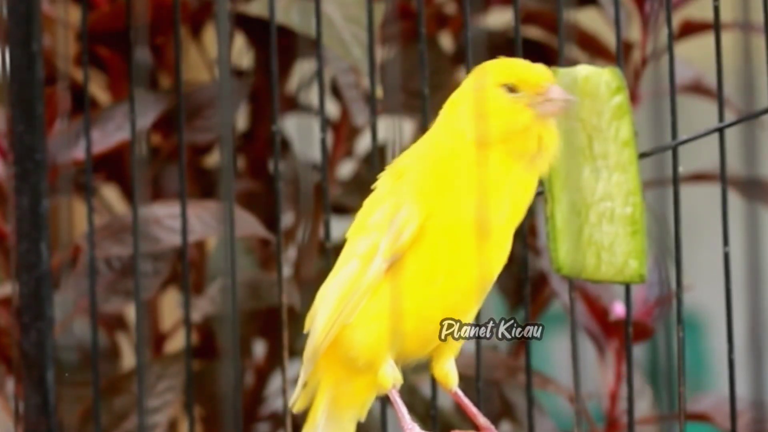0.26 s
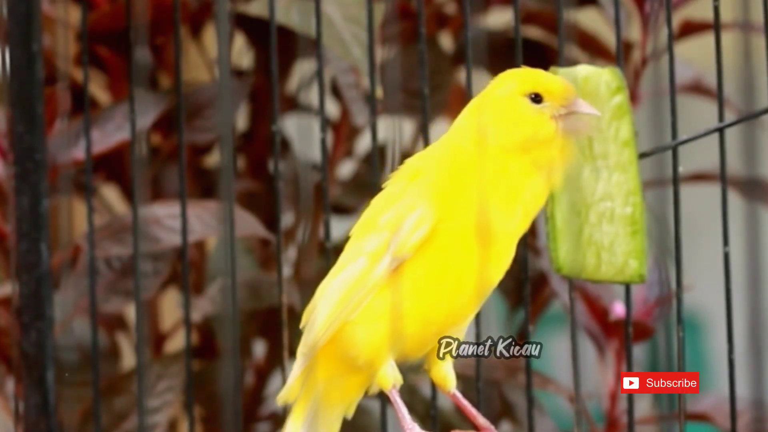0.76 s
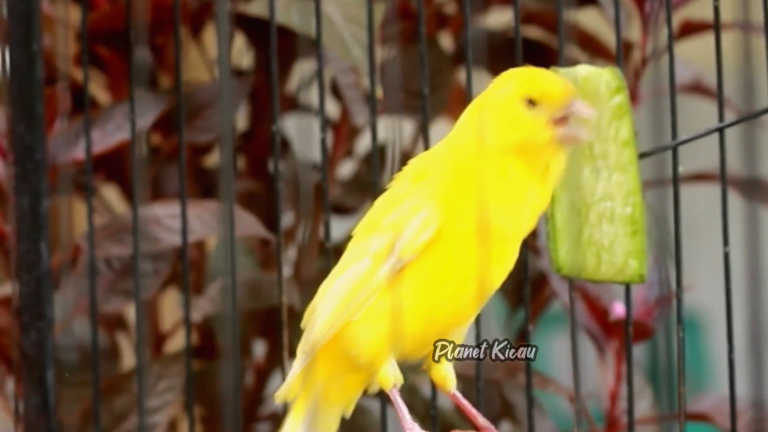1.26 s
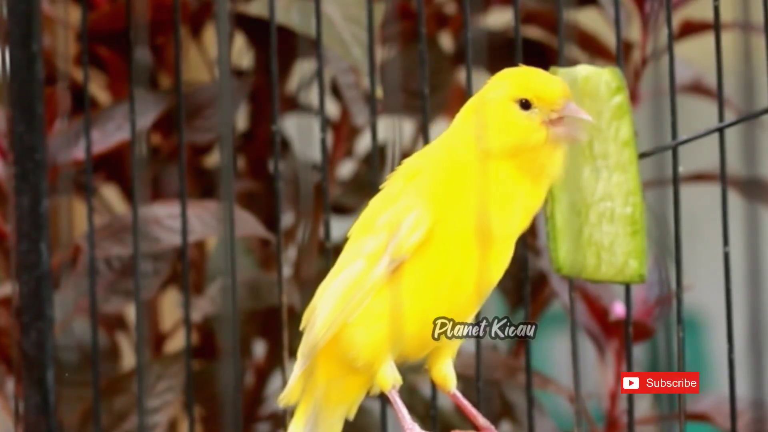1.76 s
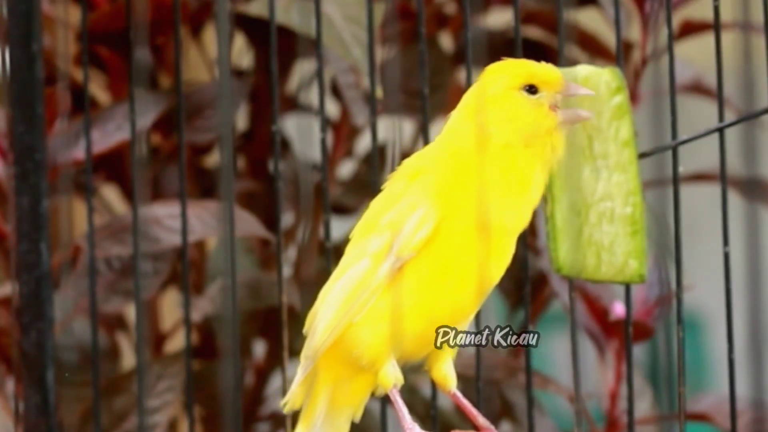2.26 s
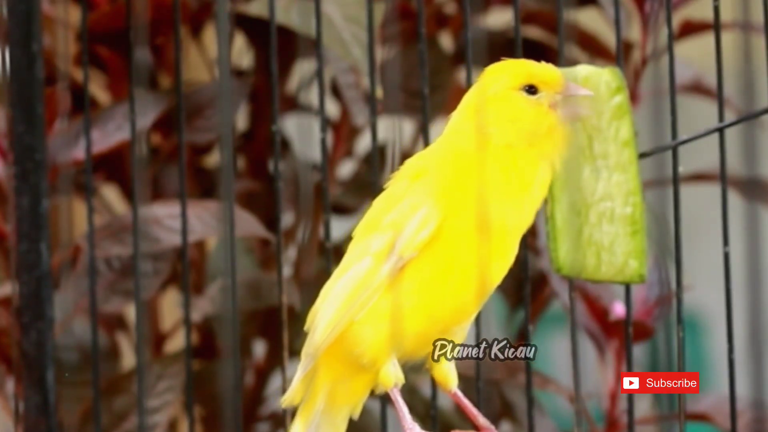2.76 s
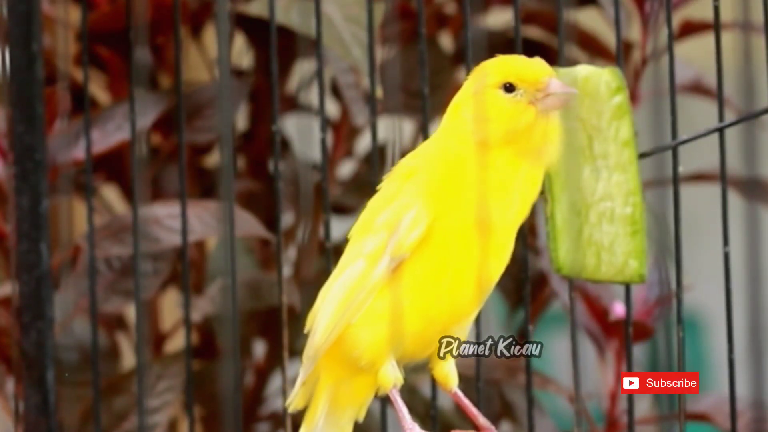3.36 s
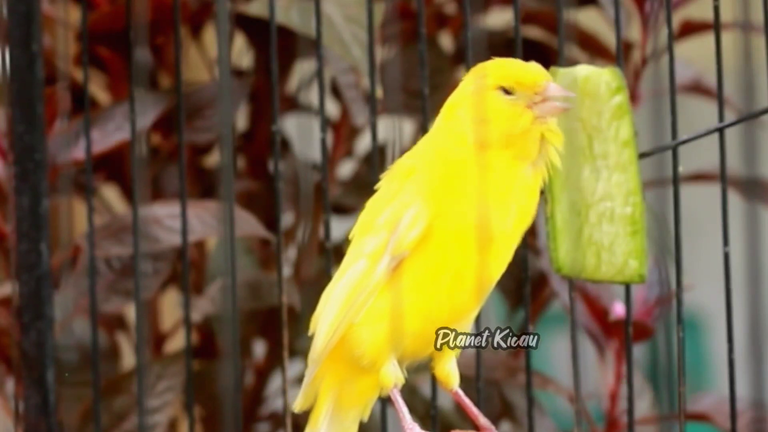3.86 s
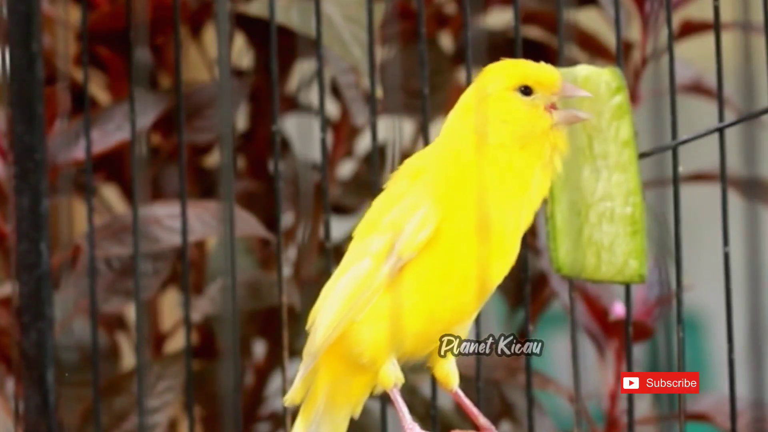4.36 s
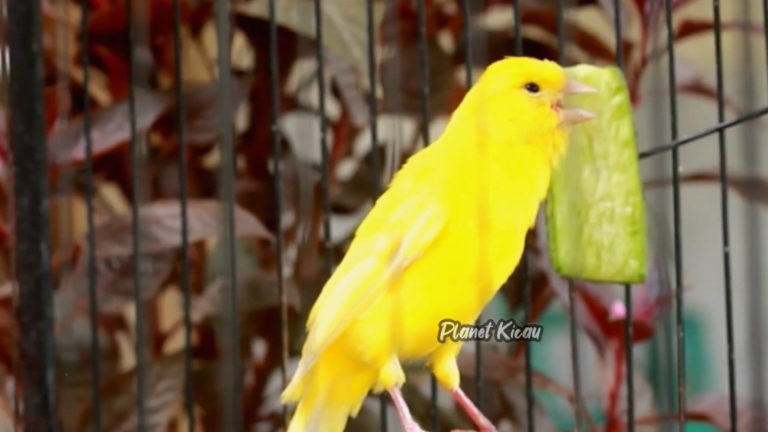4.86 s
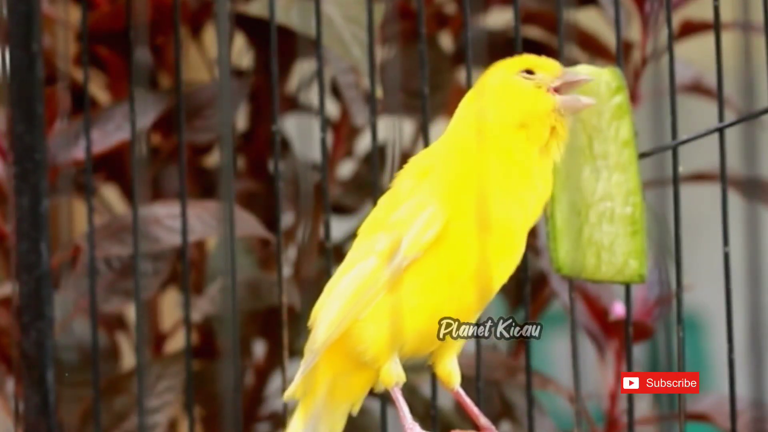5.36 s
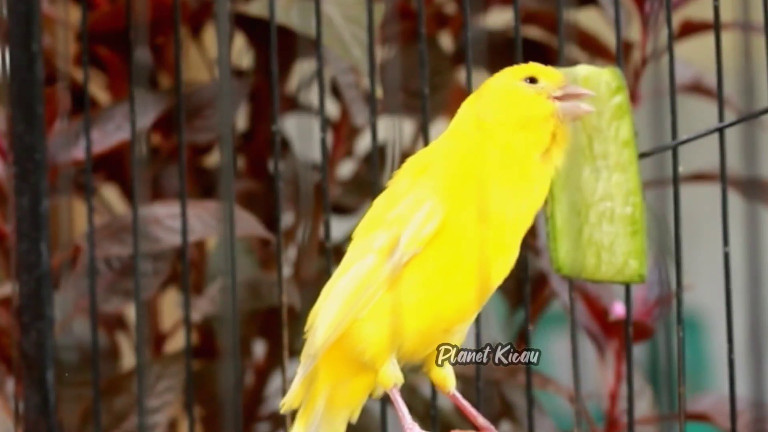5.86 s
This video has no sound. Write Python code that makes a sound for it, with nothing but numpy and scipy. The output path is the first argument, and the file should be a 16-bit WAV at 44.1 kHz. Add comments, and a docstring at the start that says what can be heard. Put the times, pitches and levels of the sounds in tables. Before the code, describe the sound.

A single small songbird, heard close up indoors. It is already trilling at the start: even, very short down-sweeps, crisp and chattering, for almost four seconds. Then the song switches to long, loud, sliding whistles, roughly three or four a second, each dropping from a thin high onset into a strong, clear lower tone, still going at the end. Light room tail; barely audible low rumble and thin hiss beneath.

```python
"""A caged canary sings close to the microphone in a small, quiet room.
First comes a fast trill in three phrases: about ten steep down-sweeps a second, one gliding tone each.
Then come nine long, loud whistles that fall more and more slowly. Every syllable passes from the high
to the low side of the syrinx on its way down, with overtones and a rasp of filtered noise around it.
Early reflections and a decaying tail follow the song; a rumble and a thin hiss lie beneath throughout."""
import sys
import numpy as np
from scipy import signal
from scipy.fft import rfft, irfft, next_fast_len
from scipy.io import wavfile
from scipy.ndimage import uniform_filter1d, map_coordinates

SR = 44100
rng = np.random.default_rng(int(sys.argv[2]) if len(sys.argv) > 2 else 0)


def put_to_file(sound):
    """Save the sound as 16-bit audio at rate SR, in the file named by the first command-line argument."""
    columns = np.atleast_2d(sound).T  # one column per channel
    safe = np.clip(columns, -1, 1)
    whole_steps = np.round(safe * 32767)
    wavfile.write(sys.argv[1], SR, whole_steps.astype(np.int16))


N = 269010  # length of the scene [samples]

# trill syllables: start t/s, length before repeats t/ms, first short repeat after t/ms,
# length of that repeat t/ms, base level/dB
TRILL = [(-0.017, 47.7, 10.5, 2.2, -29), (0.072, 61, 72, 9.2, -26), (0.1679, 49.5, 9, 10, -25.5),
         (0.267, 56.8, 5.5, 8.3, -27), (0.3735, 52.4, 18.5, 12.4, -26.5), (0.4797, 59.7, 58.5, 11.4, -26),
         (0.5792, 56.6, 16.5, 10.4, -27), (0.688, 51.5, 33, 10.7, -27.2), (0.7948, 53.8, 54.5, 12.7, -27),
         (0.8885, 52.5, 1, 11.3, -24), (1.004, 56.9, 20.5, 10.3, -24.5), (1.1135, 68.4, 76, 8.2, -23),
         (1.217, 58.5, 21.5, 11.5, -23.5), (1.3284, 66.3, 26.5, 4.1, -22), (1.4362, 53, 9.5, 13.1, -23.5),
         (1.5466, 66.4, 28, 6.5, -24.5), (1.6668, 50.6, 16, 6, -20.5), (1.7702, 54.3, 19, 8, -27),
         (1.8726, 53.7, 47, 11.2, -26.5), (1.9642, 49, 12.5, 11.2, -27), (2.0656, 53.8, 50, 12.7, -26),
         (2.1597, 48.2, 12.5, 10.6, -28), (2.2548, 50, 23.5, 11.8, -28.5), (2.3548, 44.7, 20, 13.4, -29),
         (2.449, 54.0, 30.5, 12, -26.5), (2.5441, 55.4, 30, 10.2, -27), (2.6422, 58.6, 53.5, 10.6, -29.5),
         (2.7359, 49.7, 12.5, 11.1, -30), (2.8341, 44.3, 26.5, 9.1, -29.3),
         (2.9325, 52.4, 51.0, 12.4, -27.5), (3.0254, 50.4, 19.5, 8.9, -28), (3.115, 51.4, 8, 12.4, -29.0),
         (3.2229, 55.7, 64, 9.9, -27.5), (3.3164, 48, 11.0, 9.2, -28), (3.4134, 52, 20, 12.3, -29),
         (3.5135, 58, 72.0, 11.2, -26.5), (3.6058, 48.4, 4.5, 10.3, -28), (3.7093, 52.2, 18.5, 9.5, -26.5)]
# corner pitches of every trill sweep, from top to bottom, before rounding: f/Hz
TRILL_CORNERS = [7300, 5700, 4100, 3400, 2700, 1470]
# start of each trill phrase: t/s
PHRASE_STARTS = [-0.1, 0.98, 1.74]
# relative time on each leg between corners, one row a phrase: five shares/1
PHRASE_LEGS = [(28.15, 25, 16, 13, 11.5), (37.6, 18, 20, 14, 12), (24.17, 18.5, 9.5, 26, 19.5)]
# manner of each phrase: high over low side level/dB, change at the handover level/dB, final flick level/dB
PHRASE_MANNER = [(5, -14.5, 6.5), (-4, -12, -1), (-0.5, 3, 0.5)]
# whistles: start t/s, length before the repeat t/ms, onset f/Hz, crest f/Hz (both before the sag), bottom f/Hz,
# fall begins t/ms, fall lasts t/ms, bend/1, short repeat after t/ms, high side level/dB, low side level/dB
WHISTLES = [(3.82, 125.7, 7040, 6210, 3350, 44.5, 43.4, 1.53, 69, -32.0, -13),
            (3.997, 255.7, 7520, 7645, 2708, 28.9, 193.5, 1.45, 46.0, -20.5, -11.0),
            (4.328, 212.8, 7180, 7220, 2687, 9.5, 181.7, 1.53, 105, -21, -10.5),
            (4.601, 225.6, 5826, 7180, 2692, 11.6, 184, 1.31, 98, -20.5, -9.5),
            (4.89, 221, 5180, 7160, 2713, 24.4, 190.7, 2.06, 104, -23, -9.5),
            (5.181, 218.3, 7450, 7310, 2638, 4.9, 186.6, 1.68, 88.0, -22.5, -10.0),
            (5.443, 204.0, 5470, 7200, 2100, 25.4, 168.5, 1.9, 43, -24, -12.5),
            (5.672, 195, 4790, 7130, 2120, 25.2, 179.3, 2.02, 22, -22.5, -13.0),
            (5.9, 186, 4760, 7100, 2113, 23.9, 191, 2.24, 36, -23.5, -13.5)]
# transmission of the tone through throat and beak in the trill: f/Hz, level/dB
TRILL_TONE = [(1400, 0), (1650, -13.5), (2150, -13.5), (2500, 1), (2900, -1.5), (3300, 3.5), (3600, -3.5),
              (3850, -6.5), (4350, -4.5), (4850, 5), (5400, -4), (6300, -21), (7000, -15), (7500, -5.5)]
# the same in the whistles: f/Hz, level/dB
WHISTLE_TONE = [(2100, -31.5), (2500, -6), (2650, -11.5), (2780, -4), (3000, -6.5), (3150, -2.5), (3380, 0),
                (3550, -10), (3750, -14), (4100, -3.5), (4300, -12.5), (4850, -1.5), (5800, -5.5),
                (6700, -22), (7200, -8), (7700, -24)]
# transmission of the overtones: f/Hz, level/dB
OVERTONE_COLOUR = [(3000, -34), (4800, -10), (6400, -15), (7300, -7.5), (8500, -18.5), (9700, 3),
                   (10700, 1.5), (11400, -11), (12300, 4), (13000, -12), (14000, 5.5), (15500, -18)]
# overtones, before colour and offset: multiple/1, high side level/dB, low side level/dB
OVERTONES = [(2, -22, -32), (3, -19.5, -38.5), (4, -9, -36.5), (5, -38, -53.5)]
# spectrum of air rushing through the syrinx: f/Hz, relative level/dB
RASP = [(1200, -34), (3000, 7.5), (6000, -6.5), (8300, -3.5), (9800, -12.5), (11500, -25.5), (14000, -9),
        (15800, 0.5)]
# reverberation time (60 dB decay) of the room: f/Hz, t/s
ROOM_DECAY = [(1500, 0.68), (3000, 0.3), (5000, 0.46), (8000, 0.079), (15000, 0.13)]
# colour of the diffuse tail: f/Hz, relative level/dB
ROOM_COLOUR = [(1500, 3.5), (2300, -0.5), (2900, -2.5), (3900, 4), (5000, -4.5), (7000, 4.5), (15000, -1)]
# spectrum of the room rumble: f/Hz, relative level/dB
ROOM_TONE = [(12, -42), (20, -13.5), (65, 0), (170, -3.5), (339, -11), (497, -16.5), (901, -27.5),
             (2860, -84)]
# slow fade of the rumble: t/s, level/dB
RUMBLE_LEVEL = [(0, -64.5), (3, -67), (6, -68.5)]

HANDOVER_HZ = 3750  # pitch at which the low side takes over
TOP_HZ = 15900  # upper limit of the band and of the overtones
HISS_DB = -66.5
RISE_MS = 13  # a whistle's glide from onset to crest
SAG_HZ_PER_MS = 17  # the crest sinks until the fall proper begins
LIFT_HZ_PER_MS = 3.55  # pitch creeps up once the fall is over
LEAP_HZ, LEAP_REACH_HZ = 169.5, 307  # size scale and pitch reach of the leap over the handover
AGAIN_MS, AGAIN_STEP_MS = 51.9, 7.5  # a sound lasting this long past its first short repeat has a second


def trill():
    """Rapid frequency sweeps: level depends on pitch at the handover and in the final downward flick."""
    song = np.zeros(N)
    hz = np.arange(1300, 7600, 50)
    handover = np.exp(-((hz - HANDOVER_HZ) / 400) ** 2)
    flick = ramp((3000 - hz) / 500)
    for s, length_ms, repeat_ms, step_ms, db in TRILL:
        phrase = np.searchsorted(PHRASE_STARTS, s) - 1
        legs = np.array(PHRASE_LEGS[phrase])
        lean_db, handover_db, flick_db = PHRASE_MANNER[phrase]
        pitch = glide(TRILL_CORNERS, length_ms * legs / legs.sum(), size=60)
        tone_db = along(TRILL_TONE, hz) + handover_db * handover + flick_db * flick
        sweep = syrinx(pitch, db + lean_db / 2, db - lean_db / 2, np.transpose([hz, tone_db]),
                       overtone_db=1.0, jitter=.007, flutter_db=1.5, fade_ms=2.57)
        sweep = short_repeat(sweep, repeat_ms, step_ms, blend_ms=5)
        sweep = short_repeat(sweep, repeat_ms + AGAIN_MS, AGAIN_STEP_MS, blend_ms=5)
        add(song, s, sweep)
    return song + rasp(high_side(song, low_db=-3), rasp_db=-40.0, growth=0.68)


def whistles():
    """Falling tones from two sources: each swells where the stronger low side takes over."""
    song = np.zeros(N)
    for s, *shape, repeat_ms, high_db, low_db in WHISTLES:
        call = syrinx(whistle_pitch(*shape), high_db, low_db, WHISTLE_TONE,
                      overtone_db=0.5, jitter=.003, flutter_db=.6, fade_ms=16)
        add(song, s, short_repeat(call, repeat_ms, step_ms=6, blend_ms=8))
    return song + rasp(high_side(song, low_db=-6), rasp_db=-52.5, growth=0.35)


def syrinx(pitch, high_db, low_db, tone, overtone_db, jitter, flutter_db, fade_ms):
    """Harmonic synthesis: phase is the integral of pitch, and weak overtones share the phase of the tone."""
    size = len(pitch)
    ms = np.arange(size) * 1000 / SR
    hz = pitch * (1 + jitter * wobble(600, size) + 0.0058 * wobble(50.93, size))
    low_share = ramp(.5 + (HANDOVER_HZ - hz) / 130)
    effort_db = high_db + (low_db - high_db) * low_share + flutter_db * wobble(70, size)
    phase = 2 * np.pi * np.cumsum(hz) / SR
    voice = amp(along(tone, hz)) * np.sin(phase)
    for multiple, (_, on_high_db, on_low_db) in enumerate(OVERTONES, 2):
        side_db = on_high_db + (on_low_db - on_high_db) * low_share
        level_db = overtone_db + side_db + along(OVERTONE_COLOUR, multiple * hz)
        # the overtones are far less steady than the tone itself
        unsteady_db = 3 * wobble(163.6, size) + 2 * wobble(690, size)
        in_band = multiple * hz < TOP_HZ
        voice += amp(level_db + unsteady_db) * np.sin(multiple * phase) * in_band
    envelope = ramp(ms / 2) * ramp((ms[-1] - ms) / fade_ms)
    return np.sqrt(2) * amp(effort_db) * voice * envelope


def glide(corners, legs_ms, size):
    """Piecewise-linear pitch smoothed by a moving average: the muscles round each corner over size samples."""
    times = np.cumsum([0, *np.abs(legs_ms)])
    ms = np.arange(0, times[-1], 1000 / SR)
    return uniform_filter1d(np.interp(ms, times, corners), size=size, mode="nearest")


def whistle_pitch(length_ms, onset_hz, crest_hz, bottom_hz, begin_ms, fall_ms, bend):
    """Geometric glide: from the crest pitch falls, slowing sooner with more bend, then lifts if time is left."""
    ms = np.arange(0, length_ms, 1000 / SR)
    rise_hz = (crest_hz - onset_hz) * ramp(ms / RISE_MS)
    top = onset_hz + rise_hz - SAG_HZ_PER_MS * np.minimum(ms, begin_ms)
    to_go = np.clip(1 - (ms - begin_ms) / fall_ms, 0, 1)
    lift = LIFT_HZ_PER_MS * np.maximum(ms - begin_ms - fall_ms, 0)
    hz = bottom_hz * (top / bottom_hz) ** (to_go ** bend) + lift
    # the pitch hangs above the handover, then leaps over it
    above = hz - HANDOVER_HZ
    return hz + LEAP_HZ * np.tanh(above / 30) * np.exp(-np.abs(above) / LEAP_REACH_HZ)


def short_repeat(sound, after_ms, step_ms, blend_ms):
    """Crossfade to a delayed copy: the last step_ms before after_ms are heard twice, if it lasts that long."""
    step = np.zeros(round(step_ms * SR / 1000))
    ms = np.arange(len(sound) + len(step)) * 1000 / SR
    late = ramp(.5 + (ms - after_ms) / blend_ms)
    return (1 - late) * np.r_[sound, step] + late * np.r_[step, sound]


def high_side(song, low_db):
    """Spectral weighting: turns down the nearly pure low side in favour of the airy high side."""
    return filtered(song, lambda hz: amp(low_db * ramp((4000 - hz) / 700)))


def rasp(song, rasp_db, growth):
    """Turbulence noise: grainy air sounds only with the voice and grows as a power of its strength below one."""
    power = np.abs(uniform_filter1d(song ** 2, size=90))  # abs guards against rounding below zero
    strength = np.sqrt(power) / np.max(np.abs(song))
    air = unit(filtered(rng.standard_normal(N), lambda hz: amp(along(RASP, hz))))
    grain = amp(3.5 * wobble(300, N))
    return amp(rasp_db) * grain * strength ** growth * air


def room(x, near_db, tail_db):
    """Convolution: weak copies from surfaces near the cage, and a diffuse tail decaying at a rate set by f."""
    hz, t, z = signal.stft(rng.standard_normal(SR * 3 // 4), SR, nperseg=256)
    decay_db = 60 * t / along(ROOM_DECAY, hz)[:, None]
    fall = amp(along(ROOM_COLOUR, hz)[:, None] - decay_db)
    tail = signal.istft(z * fall * ramp(t / 0.0037), SR, nperseg=256)[1]
    answer = amp(tail_db) * tail / np.linalg.norm(tail)
    delays = rng.uniform(.001, .008, size=8)  # s
    answer[(delays * SR).astype(int)] += amp(near_db) * rng.choice([-1, 1], size=8)
    return signal.fftconvolve(x, answer)[:N]


def background(hiss_db):
    """Random noise: a low, slightly uneven and slowly fading room rumble, and a thin white hiss."""
    rumble = unit(filtered(rng.standard_normal(N), lambda hz: amp(along(ROOM_TONE, hz))))
    level_db = np.interp(np.arange(N) / SR, *np.transpose(RUMBLE_LEVEL))
    hiss = amp(hiss_db) * rng.standard_normal(N)
    return amp(level_db + 1.7 * wobble(4.1, N)) * rumble + hiss


def amp(db):
    """Decibel law: amplitude ratio of a level."""
    return 10 ** (np.asarray(db) / 20)


def unit(x):
    """Normalization: scales x to a root mean square of one."""
    return x / np.sqrt(np.mean(x ** 2) + 1e-20)


def along(points, hz):
    """Interpolation on a logarithmic frequency axis through (f/Hz, value) points."""
    f, v = np.transpose(points)
    return np.interp(np.log(hz + 1), np.log(f), v)


def wobble(rate, size):
    """Band-limited fluctuation: a smooth curve through random knots, rate of them a second."""
    knots = rng.standard_normal(int(size * rate / SR) + 4)
    return map_coordinates(knots, [np.arange(size) * rate / SR])


def filtered(x, response):
    """Linear filtering: the spectrum of x times a response of frequency."""
    m = next_fast_len(N + SR // 2)
    return irfft(rfft(x, m) * response(np.fft.rfftfreq(m, 1 / SR)), m)[:N]


def ramp(u):
    """Sine-squared transition: a smooth step from 0 to 1."""
    return np.sin(np.pi / 2 * np.clip(u, 0, 1)) ** 2


def add(track, s, sound):
    """Superposition: adds a sound to the track at s seconds, dropping what lies outside it."""
    at = round(s * SR) + np.arange(len(sound))
    inside = (at >= 0) & (at < N)
    track[at[inside]] += sound[inside]


def scene():
    """Superposition of the bird, its room and the background."""
    song = trill() + whistles()
    reflections = room(song, near_db=-22, tail_db=-15.0)
    return (song + reflections + background(HISS_DB))[None]


def record(dry):
    """Spectral folding: a faint image mirrors each f to SR/2 - f; a steep low-pass then limits the band."""
    mirror = amp(-14.5) * dry[0] * (-1) ** np.arange(N)
    return filtered(dry[0] + mirror, lambda hz: 1 / np.sqrt(1 + (hz / TOP_HZ) ** 300))[None]


dry = scene()
out = record(dry)
put_to_file(out)
```